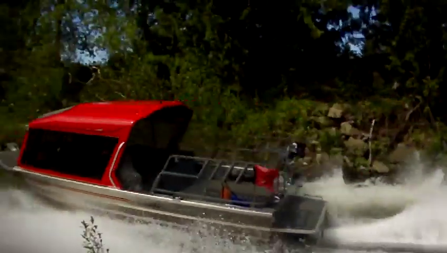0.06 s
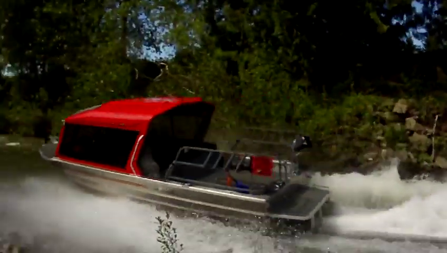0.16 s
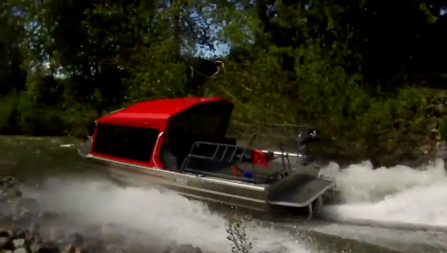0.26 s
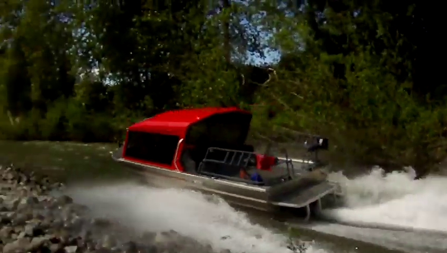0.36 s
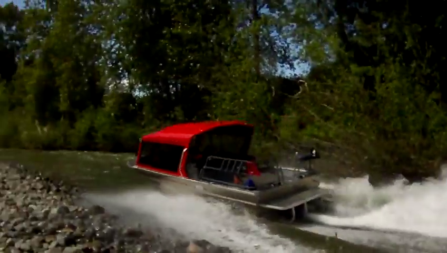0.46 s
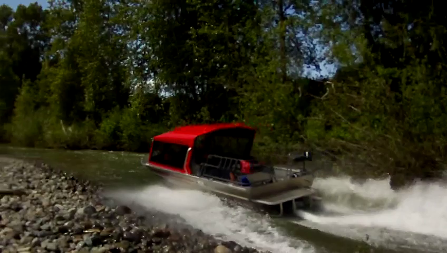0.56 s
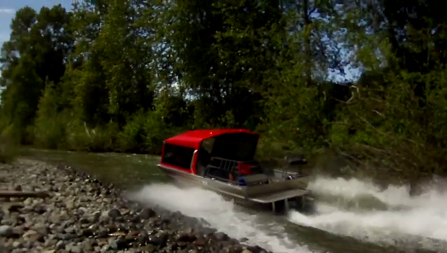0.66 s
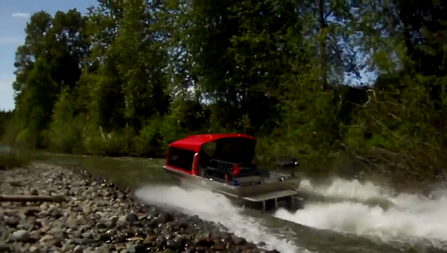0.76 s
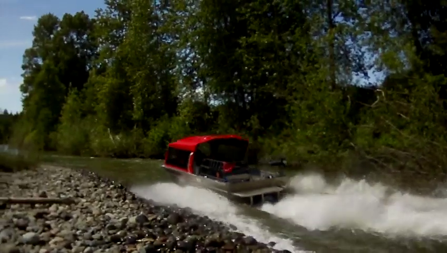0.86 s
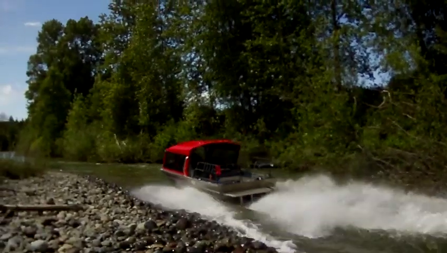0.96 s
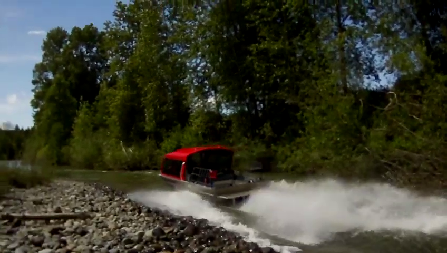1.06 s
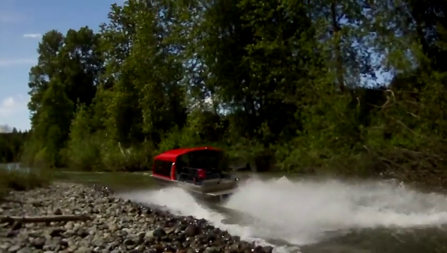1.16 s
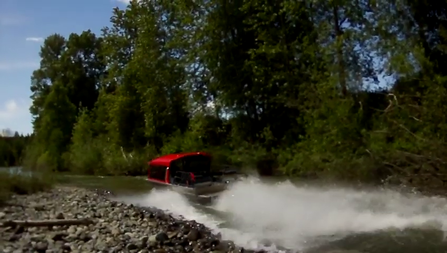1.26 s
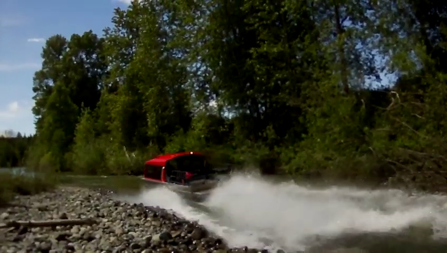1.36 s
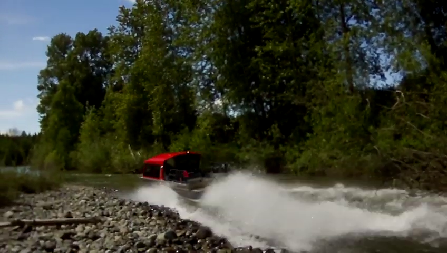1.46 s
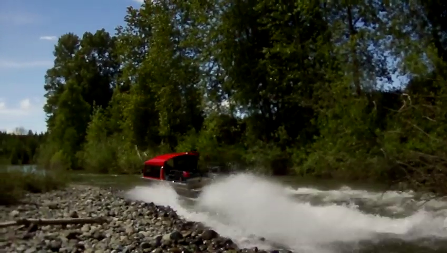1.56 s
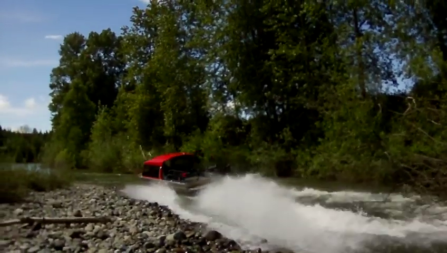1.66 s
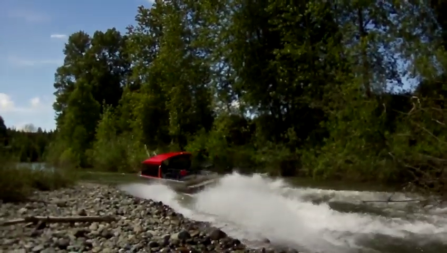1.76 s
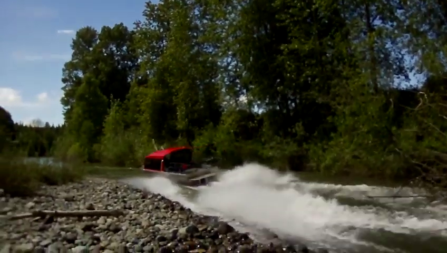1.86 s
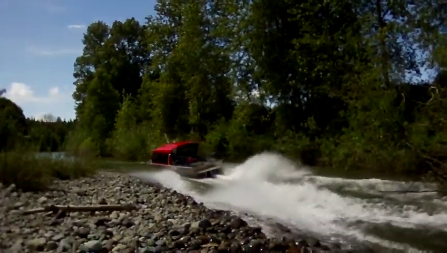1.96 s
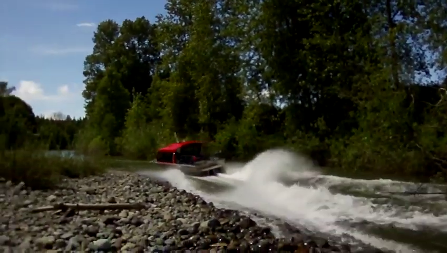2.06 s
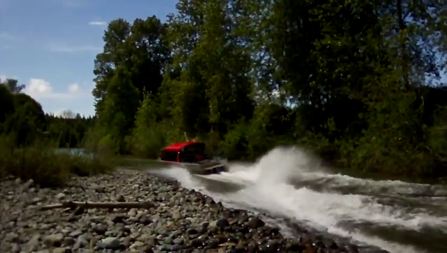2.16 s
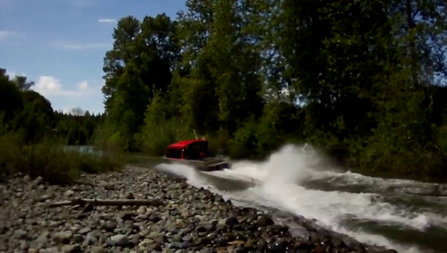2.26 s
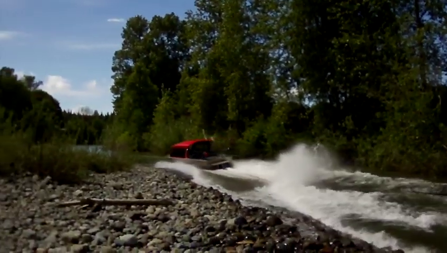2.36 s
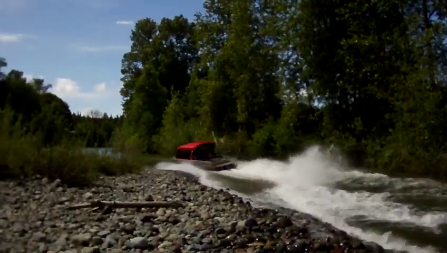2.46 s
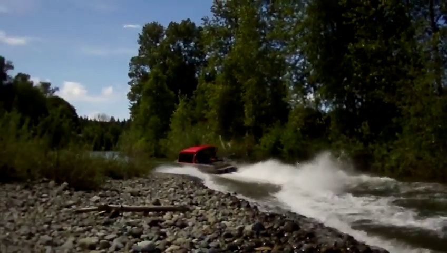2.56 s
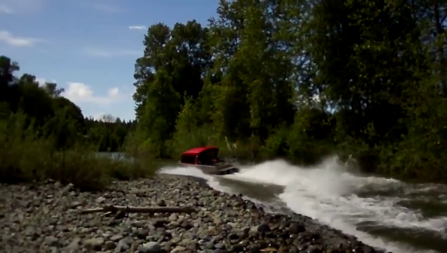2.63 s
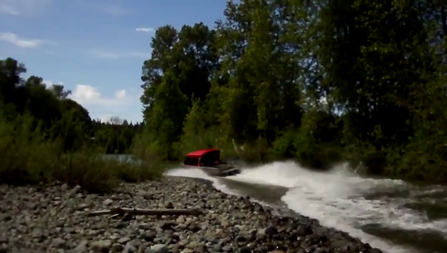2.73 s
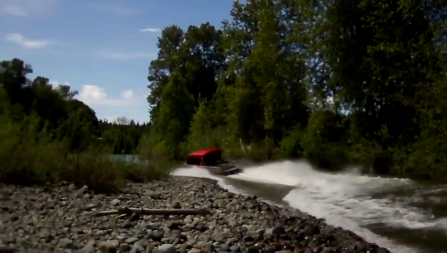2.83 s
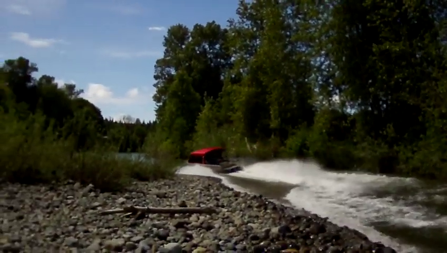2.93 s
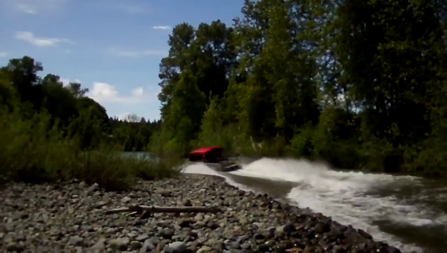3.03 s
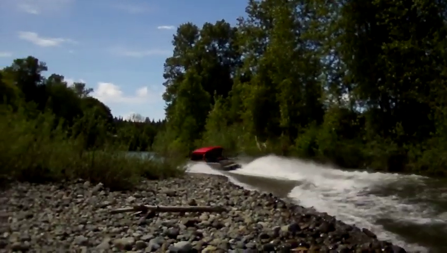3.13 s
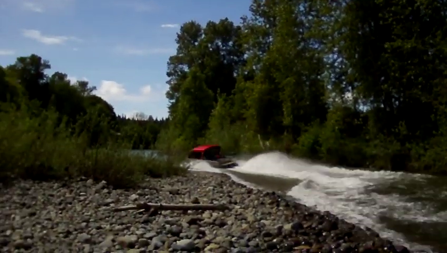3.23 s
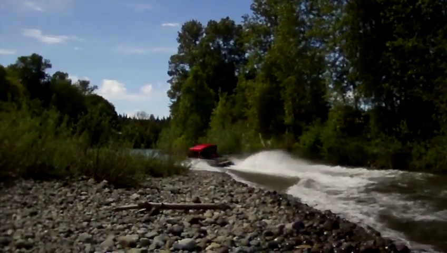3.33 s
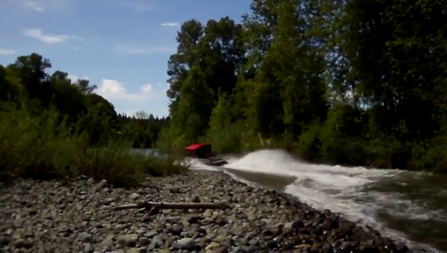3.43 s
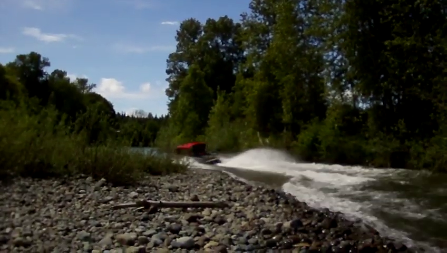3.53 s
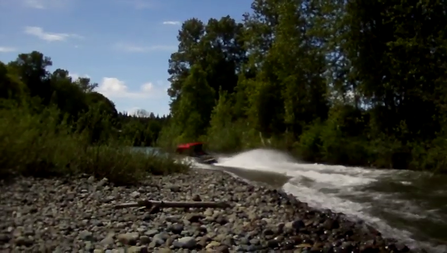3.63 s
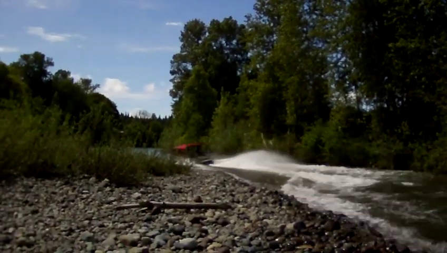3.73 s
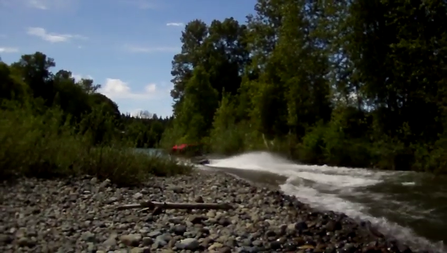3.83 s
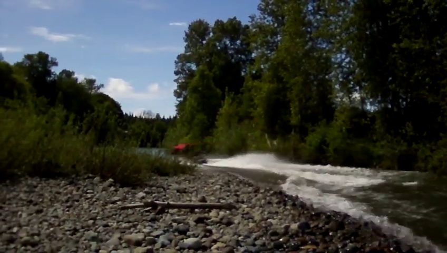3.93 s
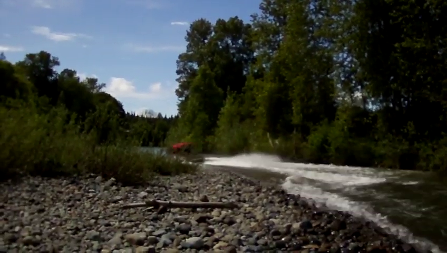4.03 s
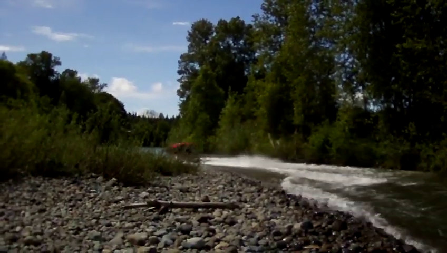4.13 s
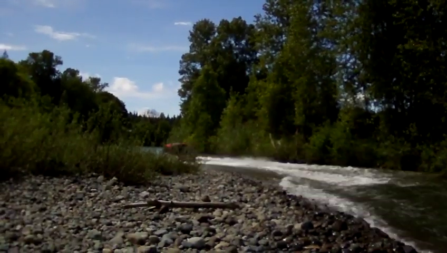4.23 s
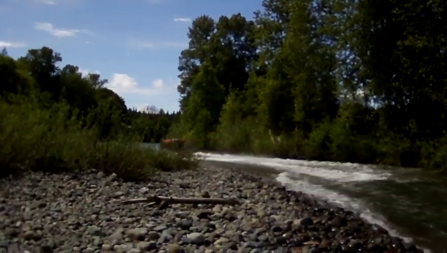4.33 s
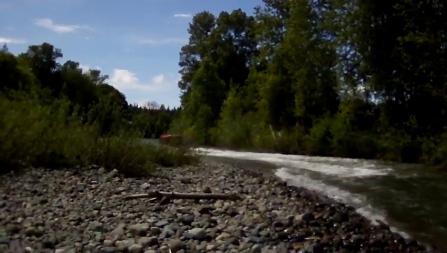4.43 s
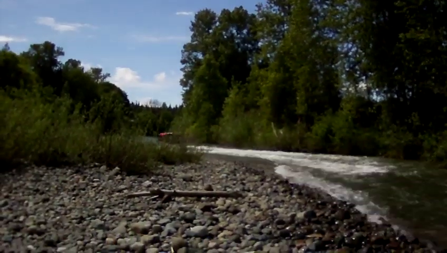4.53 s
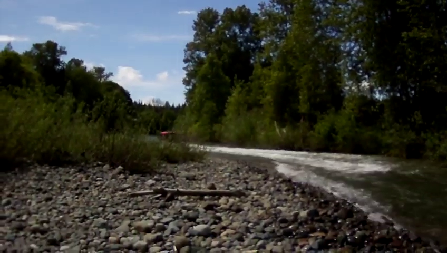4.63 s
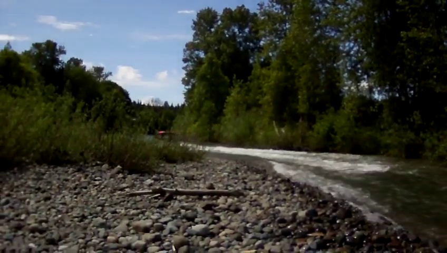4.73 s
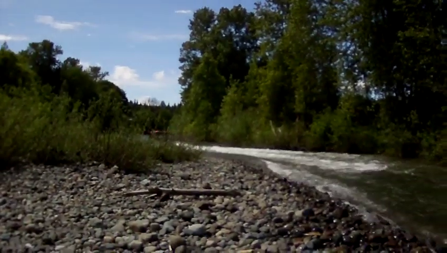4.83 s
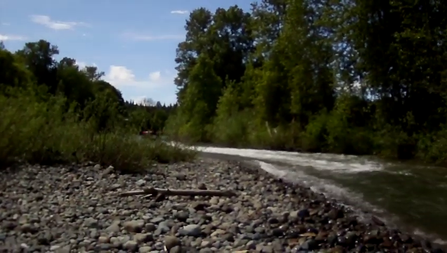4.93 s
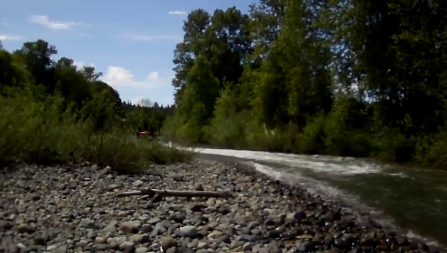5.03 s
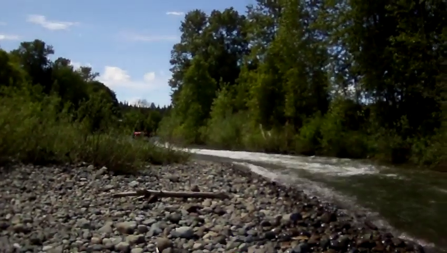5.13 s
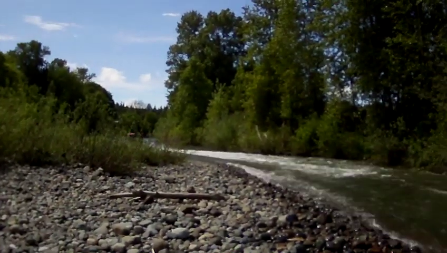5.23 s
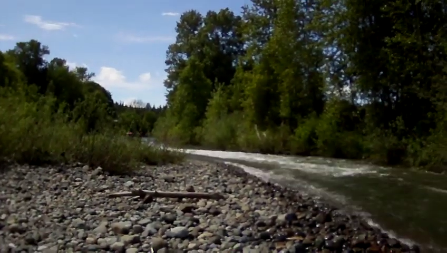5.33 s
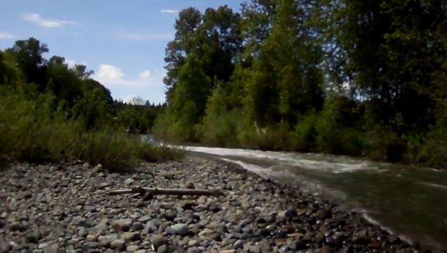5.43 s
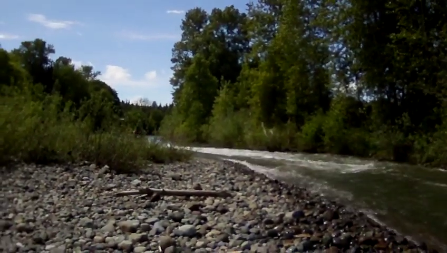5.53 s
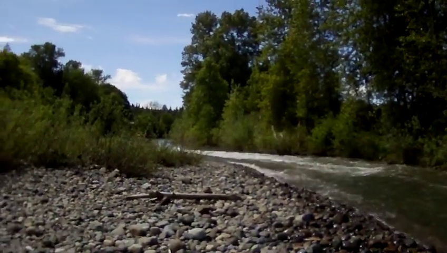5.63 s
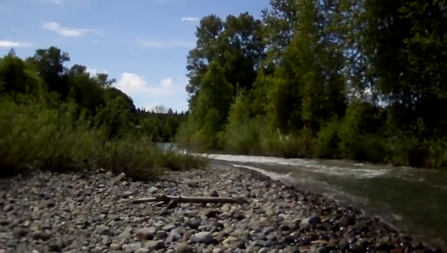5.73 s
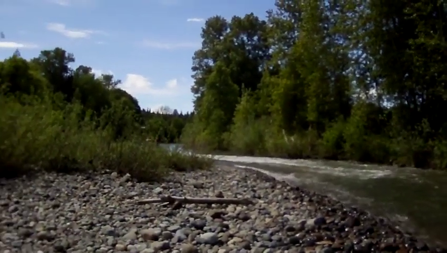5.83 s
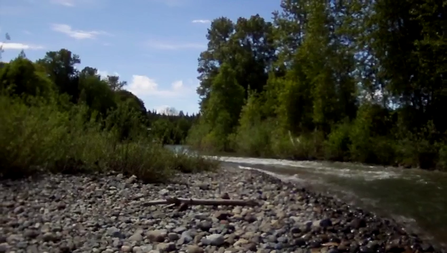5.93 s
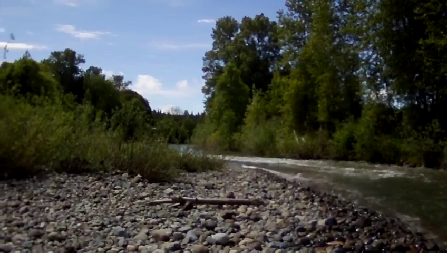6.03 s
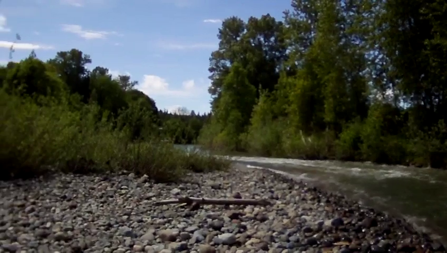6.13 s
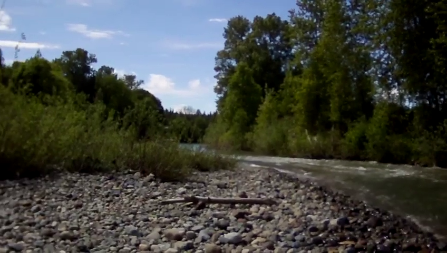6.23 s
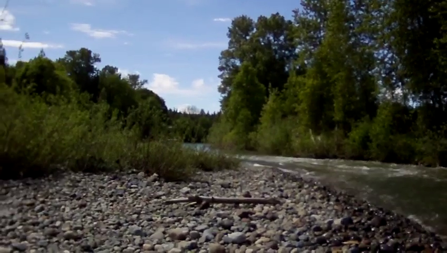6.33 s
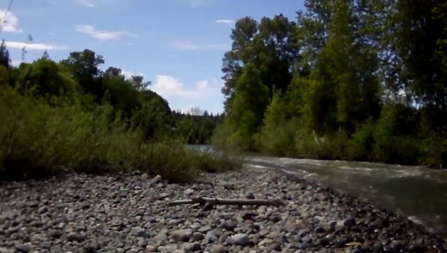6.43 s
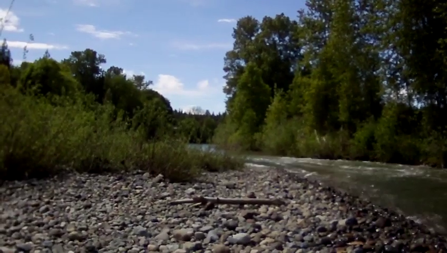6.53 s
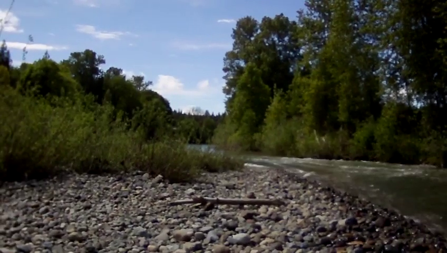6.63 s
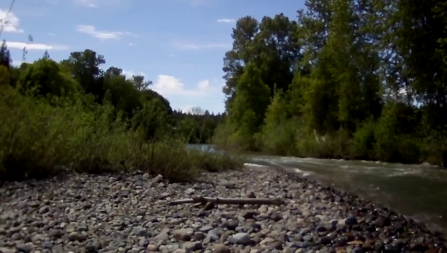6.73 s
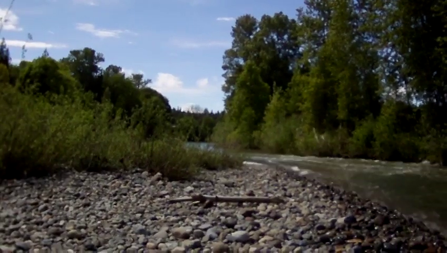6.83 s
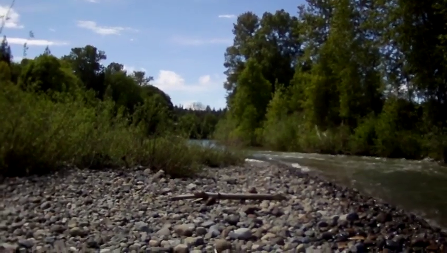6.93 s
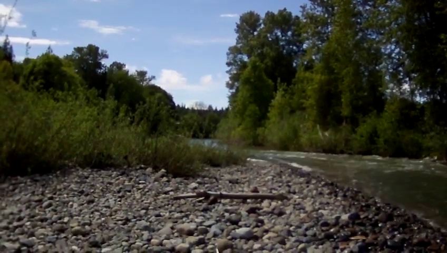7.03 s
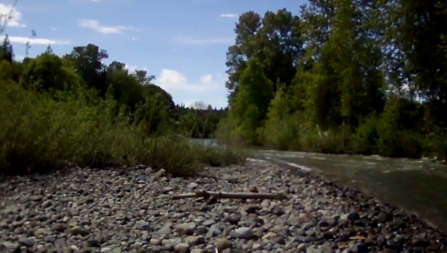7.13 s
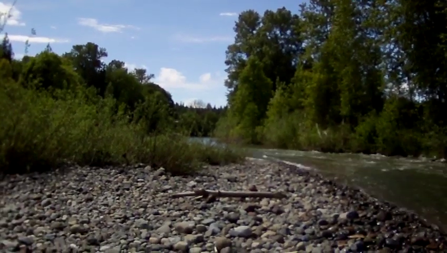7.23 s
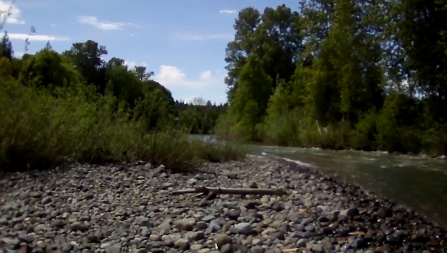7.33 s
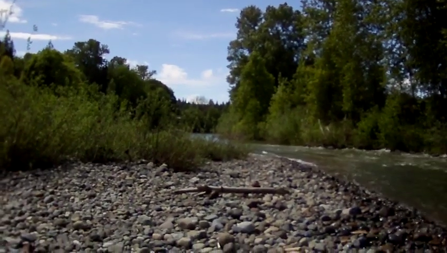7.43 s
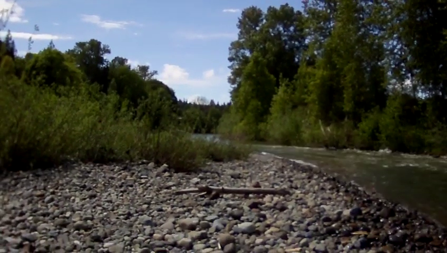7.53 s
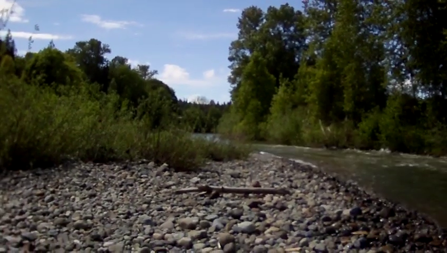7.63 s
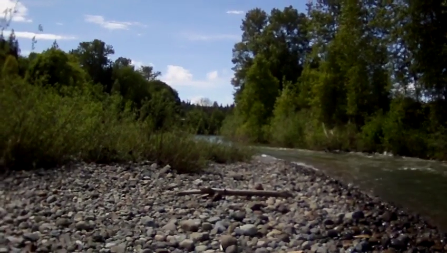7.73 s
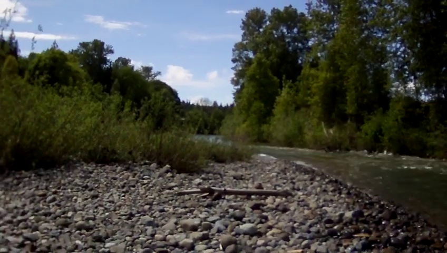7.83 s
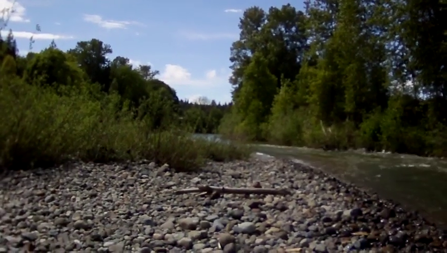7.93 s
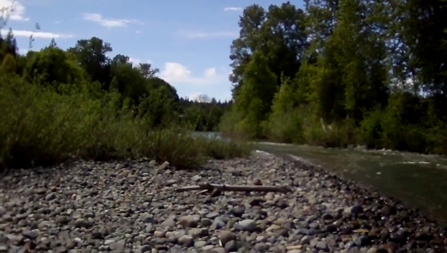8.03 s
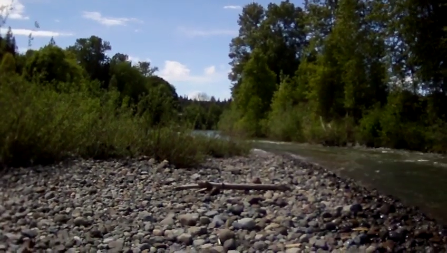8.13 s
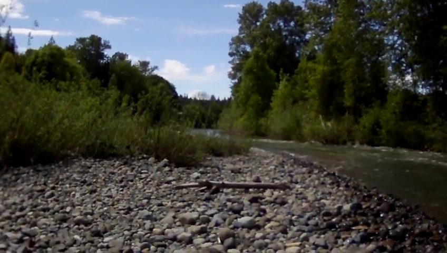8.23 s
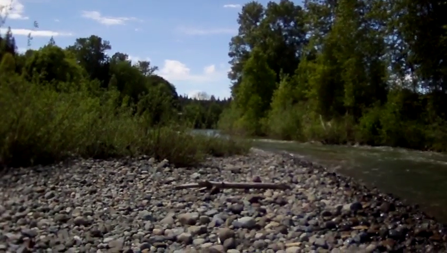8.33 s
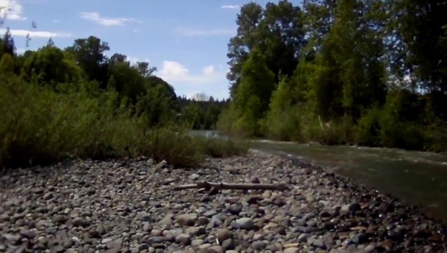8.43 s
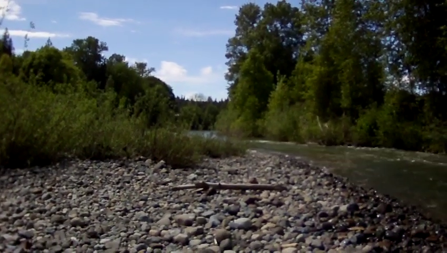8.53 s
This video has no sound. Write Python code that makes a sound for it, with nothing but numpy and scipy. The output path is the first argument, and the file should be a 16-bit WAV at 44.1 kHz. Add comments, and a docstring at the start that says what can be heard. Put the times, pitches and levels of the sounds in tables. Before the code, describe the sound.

Outdoors on a gravel riverbank, a loud boat engine is already alongside: rapid, rough exhaust cracks, deep roar and bright water hiss. It draws away quickly, becoming a smoother hum whose pitch drops, rises and drops again with throttle changes. The sound grows distant and wavering but stays audible to the end, over soft river rush and slight wind buffeting at a small, slightly dull microphone.

```python
"""One first hears a barking exhaust close by: a jet boat with an eight-cylinder engine, just past a gravel bar.
As it runs away up a river bend the bark dies and a drone of clean engine orders follows the throttle moves.
The orders are summed sines; the bark is filtered impulses, one set per loud firing; the banks return echoes.
Roar, hissing spray and the steady rush of the river are coloured noise whose octaves flicker apart.
Light wind on a small microphone is low band-passed noise with gusts."""
import sys
import numpy as np
from scipy import signal
from scipy.fft import rfft, irfft, next_fast_len
from scipy.io import wavfile

SR = 44100
rng = np.random.default_rng(int(sys.argv[2]) if len(sys.argv) > 2 else 0)


def store_pcm(level_fs):
    """Save levels as 16-bit WAV."""
    pcm = np.round(np.clip(level_fs, -1, 1) * 32767).astype(np.int16)
    wavfile.write(sys.argv[1], SR, np.atleast_2d(pcm).T)


N = 378378

# Spectrum of the river's rush, relative: [f/Hz, density/dB]
RIVER_SPECTRUM = [(160, -4), (280, 0), (364, -22), (409, -50), (515, 2.5), (659, 2.5), (752, -1.5),
                  (994, -12.5), (1380, -13.5), (1830, -6), (3150, -21.5), (3830, -36), (4590, -23),
                  (6380, -43), (14300, -34.5)]
RIVER_DB = -52  # before its flicker
# Wind gusts, added to the steady wind: [middle t/s, half-length t/s, level/dB]
GUSTS = [(.01, 0.044, -54), (0.361, 0.079, -57), (0.904, 0.17, -58), (3.3, .3, -77), (5.61, 0.11, -62),
         (8.05, 0.24, -72), (8.58, 0.061, -68)]
WIND_BAND_HZ = (22, 76.4)
WIND_START_DB, WIND_DB_PER_S = -62.5, -3
# Spectrum of the spray's hiss, relative: [f/Hz, density/dB]
SPRAY_SPECTRUM = [(760, -86), (1300, -5.5), (1560, 0.5), (1780, 1.5), (2520, 7), (2790, -5.5), (3220, 3),
                  (3860, 5.5), (4740, -7.5), (6560, -6.5), (7340, -13), (8210, -12), (11600, -22),
                  (13800, -33), (14800, -44)]
# Treble lift of the spray above 3 kHz, written with its sign reversed: [t/s, minus lift/dB per octave]
MINUS_TREBLE_LIFT = [(0, -4), (1.1, -3.5), (1.5, -2), (3, -2), (4.5, -2.5), (8.58, -2.7)]
GRAIN_START_DB, GRAIN_FADE_S = 1, 3.9  # fast unsteadiness of the close spray
# Spectrum of the exhaust roar, relative: [f/Hz, density/dB]
ROAR_SPECTRUM = [(70, -58), (130, 3), (250, -4), (350, -3), (500, 1.5), (700, -6), (1000, -15),
                 (1500, -31.5), (2500, -74)]
# Course of the two noises of the boat, before flicker: [t/s, roar level/dB, spray level/dB]
PASS_LEVELS = [(0, -36, -37), (.07, -33, -36), (.16, -33.5, -39.5), (.36, -31.5, -40.5), (.7, -37, -44),
               (.9, -35.5, -42.5), (1.08, -37, -44), (1.25, -39.5, -45.5), (1.5, -40, -44.5),
               (2.1, -42.5, -47), (2.55, -42, -49.5), (2.85, -44.5, -49.5), (3.23, -44.5, -52),
               (3.99, -50, -54.5), (4.8, -48, -57), (5.5, -50, -57.5), (7.03, -54, -59.5),
               (8.1, -52.5, -58), (8.58, -51, -59)]

# Engine speed aimed at by each throttle move: [t/s, f/(cycles of two turns per s)]
THROTTLE = [(0, 22.547), (.807, 28.088), (1.193, 26.673), (2.42, 15.306), (2.83, 26.098), (3.224, 24.177),
            (3.443, 19.241), (3.919, 14.63), (4.045, 10.031), (4.355, 14.308), (4.694, 22.715),
            (5.244, 13.847), (5.799, 10.054), (6.07, 11.62), (6.935, 14.104), (7.156, 18.802),
            (7.606, 17.084), (8.255, 22.363)]
ENGINE_LAG_S = .216
DOPPLER_CYCLE_HZ, DOPPLER_FADE_S = .513, .171  # excess pitch left over from the pass
# Response of pipes, water and microphone to the orders: [f/Hz, gain/dB]
PIPE_RESPONSE = [(40, -37), (70, -11.5), (95, -5.5), (125, 3), (150, 7), (190, 0.5), (230, -1.5),
                 (270, -3.5), (325, -5), (370, -4), (445, 3), (530, -7.5), (650, -11), (900, -67),
                 (1300, -14)]
# Strong orders ahead of bias and pipes: [t/s, even firing level/dB, lope of the unlike banks level/dB]
STRONG_ORDERS = [(0, -31.5, -33), (.2, -33.5, -30.5), (.75, -28.5, -32), (1.05, -42.5, -34),
                 (1.5, -55, -34.5), (1.9, -45.5, -33.5), (2.3, -51, -37), (2.6, -38.5, -40),
                 (2.9, -40, -45), (3.2, -43.5, -37.5), (3.6, -43, -43), (4.1, -43.5, -50.5),
                 (4.5, -45.5, -43), (4.9, -46.5, -47.5), (5.4, -43, -51), (6, -48.5, -53.5),
                 (6.7, -53.5, -63), (7.3, -48.5, -56), (7.7, -45.5, -55.5), (8.3, -45, -53.5),
                 (8.58, -49.5, -74)]
EVEN_ORDERS, LOPE_ORDERS = (8, 16), (5, 11, 13)
# The two cylinder banks are unlike, so some orders stand out: {order: gain/dB}
ORDER_BIAS = {4: 7.7, 5: 7.13, 6: -3.2, 7: 0.54, 8: 2.84, 9: -3.5, 10: 1.7, 11: -3, 12: -2, 13: -3, 14:
              0.93, 15: 4.2, 17: -0.28, 16: -3, 18: -0.87, 19: 0.26, 20: 0.44, 21: 0.73, 24: 1, 26: 1.3}
# Balance of the orders shifts as the boat turns away: {order: slope/dB per s}
ORDER_TREND = {3: -0.74, 4: -0.37, 5: -2.33, 6: 0.99, 9: 0.55, 14: 0.75, 15: -0.78}
# Passing dips of single orders: [order, middle t/s, half-length t/s, depth/dB]; negative depth swells
ORDER_DIPS = [(8, 3.86, .05, 20), (8, 5.12, .025, 16), (8, 5.51, .03, 16), (6, .35, .5, 16),
              (16, 1.4, .25, 10), (6, 2.2, .2, 12), (5, 3.0, .25, 8), (16, 3.0, .25, 8), (8, 3.4, .2, 5),
              (15, .25, .4, -8), (17, 1.05, .15, -6), (14, 2.1, .7, 10), (14, 3.3, .2, 8), (6, 3.4, .3, 3),
              (19, 3.55, .3, 3), (13, 4.0, .3, 5), (15, 1.6, .3, 4), (16, .6, .25, -3), (16, 5.75, .15, 7),
              (16, 6.3, .12, 7), (8, 6.2, .04, 4), (20, .15, .25, 9), (19, .3, .25, 8), (7, .6, .35, 5),
              (23, .66, .08, -9), (3, 2.6, .6, 10), (6, 4.65, .25, -6), (17, 7.15, .2, -8),
              (18, 7.35, .3, -8), (11, 7.1, .2, -4), (20, 6.75, .3, -6), (12, 6.55, .25, 6),
              (22, .4, .3, 5), (16, 4.3, .12, 5), (18, 1.1, .12, -3), (12, 2.8, .7, -5), (10, 2.75, .2, 8),
              (9, 4.3, .15, -8), (12, 4.7, .2, 6), (5, 5.3, .2, -7), (6, 5.25, .25, 5), (14, 5.35, .15, -5),
              (4, 2.75, .25, 6), (20, 2.35, .3, -6), (7, 2.3, .2, -4), (15, 5.3, .35, 10),
              (16, 6.05, .08, -5), (14, 5.85, .1, -5), (5, 8.3, .3, 8), (7, 1.7, .4, -4), (9, 1.75, .3, 12),
              (9, 3.1, .6, -5), (4, .1, .3, 6), (4, 4.0, .25, 12), (4, 5.3, .35, 7), (15, 3.85, .3, 10),
              (21, 1.4, .3, 12), (18, 1.55, .2, 10), (12, 1.6, .5, -5), (13, 2.9, .2, -6),
              (11, 3.35, .25, -4), (14, 3.95, .15, -4), (13, 4.95, .12, -6), (9, 5.85, .2, -6),
              (14, 6.7, .3, 8), (7, 3.15, .3, -3), (7, 5.1, .2, 7), (17, 1.9, .5, 9), (15, 3.1, .4, 9),
              (10, 3.6, .3, 8), (10, 5.4, .3, 8), (12, 5.25, .2, 8), (7, 5.8, .4, 7), (16, 3.95, .3, 10),
              (5, 4.7, .35, 12), (7, 4.65, .35, 10), (13, 4.6, .2, 8), (16, 5.25, .2, 16),
              (11, 5.35, .3, 6), (11, 8.1, .5, 8), (16, 8.4, .3, 7)]
# Swells of the minor orders above 16: [middle t/s, half-length t/s, gain/dB]
HIGH_SWELLS = [(0.605, 0.48, 7.5), (3.68, 0.52, 6)]
# Minor orders below and above 16: (start/dB, slope/dB per s, slope/dB per cycle/s above the reference)
MINOR_LOW, MINOR_HIGH = (-45, -2.27, 0.59), (-50, -2.4, 1)
REFERENCE_CYCLE_HZ = 20.66
# Scale of the random phases drawn apart by echoes: [t/s, phase/rad]
PHASE_SMEAR = [(0, 1.6), (3.05, 1.8), (3.27, .8), (3.48, .7), (3.65, 1.4), (4.4, 2.4), (6, 3.2),
               (8.58, 3.0)]
# Low minor orders take a share of the smear near by, and a lag in cycles per rad of smear scale
MINOR_SMEAR_SHARE, MINOR_LAG = .35, .019
WOBBLE_CYCLES = .003  # unsteady running
# Stern on, minor orders from 15 up keep step with the firing, later and later
IN_STEP_MIDDLE_S, IN_STEP_HALF_S, IN_STEP_SHARE = 1.0, .22, .85
IN_STEP_LAG_CYCLES, IN_STEP_LAG_S = (.02, .1), (.8, .95)
# Near the stern the thumps stand in for the minor orders above this one
NEAR_ORDER, NEAR_DUCK_DB, NEAR_UNTIL_S = 22, 9, 1.0
# Round the bend every order but the first even one wavers more
FAR_FROM_S, FAR_FULL_S, FAR_WAVER_DB, FAR_WAVER_RAD = 3.8, 6.0, 1.6, .45

# Loud firings of a cycle: [share of cycle, crack/dB, thump/dB, heard from t/s, dies away at t/s];
# both levels are relative
FIRINGS = [(.052, -1, 0, -1, 1.13), (.352, -4.5, -8, -1, .70), (.662, -2.5, -1, -1, .58),
           (.725, -2.5, -9, .58, .72)]
CRACK_GAIN_DB, CRACK_HZ, CRACK_JITTER_S = 1.0206, (573, 980), .00009
STEP_EARLY_S, STEP_LATE_S = .001134, .0006966  # the two pressure steps about the firing, at t = 0
THUMP_GAIN_DB, THUMP_HZ, THUMP_ENDS_EARLY_S = 7.5, (520, 900), .08
THUMP_SINK_DB, THUMP_SINK_FROM_S, THUMP_SINK_OVER_S = 7, .68, .25  # as the stern draws off
SNAP_GAIN_DB, SNAP_SCATTER_DB, SNAP_HZ = -23.5, 4, (1400, 4500)
# Echoes off the wooded banks, relative: [delay t/s, level/dB]
ECHOES = [(0.048, -3), (.083, 4), (0.132, 16), (.19, 17.5), (0.269, -4)]
# Common gain of all echoes: [t/s, gain/dB]
ECHO_GAIN = [(0, -29), (2.5, -45.5), (4, -33), (6, -61), (7.5, -31), (8.58, -53)]
CUTOFF_HZ = 14966


def from_db(db):
    """Level to amplitude: 20 dB is a factor of ten."""
    return 10 ** (np.asarray(db) / 20)


def rms_one(x):
    """Normalisation to unit root-mean-square amplitude."""
    return x / np.sqrt(np.mean(x ** 2) + 1e-20)


def in_time(rows):
    """Linear interpolation of each column at every sample."""
    s, *columns = np.transpose(rows)
    return [np.interp(np.arange(N) / SR, s, c) for c in columns]


def at_hz(points, hz):
    """Linear interpolation of a spectrum in dB over log frequency."""
    table = np.array(points)
    return np.interp(np.log(hz), np.log(table[:, 0]), table[:, 1])


def bump(t, middle_s, half_s):
    """Gaussian bell of height 1, falling to 1/e at the half-length."""
    return np.exp(-((t - middle_s) / half_s) ** 2)


def drift(corner_hz, size=1):
    """Slow random process of unit spread at every size-th sample: noise through two equal poles."""
    coarse = 40  # samples between draws
    r = np.exp(-2 * np.pi * corner_hz * coarse / SR)
    noise = rng.standard_normal(N // coarse + 2002)
    slow = signal.lfilter([1], [1, -2 * r, r * r], noise)[2000:]  # drop the settling
    return np.interp(np.arange(0, N, size) / coarse, np.arange(len(slow)), rms_one(slow))


def band(x, hz):
    """Butterworth band-pass: maximally flat within the band."""
    return signal.sosfilt(signal.butter(2, hz, "band", fs=SR, output="sos"), x)


def patchy_noise(spectrum, patchy_db, treble_lift_db=0):
    """Spectral shaping of white noise, split into overlapping octaves whose levels flicker apart."""
    size = next_fast_len(N)
    hz = np.maximum(np.arange(size // 2 + 1) * SR / size, 1)
    colour = rfft(rng.standard_normal(size)) * from_db(at_hz(spectrum, hz))
    colour /= np.std(irfft(colour, size))
    out, together = 0, drift(3.9)
    for centre_hz in 62.5 * 2. ** np.arange(9):
        octaves = np.log2(hz / centre_hz)
        share = np.where(abs(octaves) < 1, np.cos(np.pi / 2 * octaves) ** 2, 0)
        if np.any(abs(colour * share) > 0):
            flicker_db = patchy_db * (.3 * together + drift(9.0))
            gain_db = flicker_db + treble_lift_db * max(np.log2(centre_hz / 3000), 0)
            out = out + from_db(gain_db) * irfft(colour * share, size)[:N]
    return out


def river():
    """Broadband flow noise: a steady level with a coloured spectrum."""
    return from_db(RIVER_DB) * patchy_noise(RIVER_SPECTRUM, patchy_db=0.5)


def wind():
    """Low-frequency wind noise at the microphone: lumpy band-passed noise that eases off, with gusts."""
    t = np.arange(N) / SR
    level = from_db(WIND_START_DB + WIND_DB_PER_S * t)
    level = level + sum(from_db(db) * bump(t, s, half_s) for s, half_s, db in GUSTS)
    lumps = from_db(1.5 * drift(6.0))
    rumble = band(band(rng.standard_normal(N), WIND_BAND_HZ), WIND_BAND_HZ)
    return level * lumps * rms_one(rumble)


def spray(level_db):
    """Broadband hiss of thrown water: coloured noise, its fast grain fading as the boat leaves."""
    treble_lift_db = -in_time(MINUS_TREBLE_LIFT)[0]
    grain_db = GRAIN_START_DB * np.exp(-np.arange(N) / SR / GRAIN_FADE_S) * drift(140.0)
    hiss = patchy_noise(SPRAY_SPECTRUM, patchy_db=0.6, treble_lift_db=treble_lift_db)
    return from_db(level_db + grain_db) * hiss


def roar(level_db, cycles):
    """Amplitude modulation: gas and water tumble out hardest just after the strongest firing."""
    throb = 1 + 0.022 * np.cos(2 * np.pi * (cycles - .1))
    return from_db(level_db) * throb * patchy_noise(ROAR_SPECTRUM, patchy_db=1.04)


def engine_speed():
    """Critically damped lag towards each throttle setting, with a Doppler excess decaying after the pass."""
    t = np.arange(N) / SR
    hz = THROTTLE[0][1] + DOPPLER_CYCLE_HZ * np.exp(-t / DOPPLER_FADE_S)
    for (_, before), (s, after) in zip(THROTTLE, THROTTLE[1:]):
        lags = np.maximum(t - s, 0) / ENGINE_LAG_S
        hz = hz + (after - before) * (1 - (1 + lags) * np.exp(-lags))
    return hz


def drone(cycles, cycle_hz, waver_db, waver_rad):
    """Fourier synthesis: orders 3 to 39 as sines timed from the strongest firing, phases smeared by echoes."""
    step = 8  # synthesise at a reduced rate
    t, cycle_hz = np.arange(0, N, step) / SR, cycle_hz[::step]
    even_db, lope_db = [c[::step] for c in in_time(STRONG_ORDERS)]
    smear_rad = in_time(PHASE_SMEAR)[0][::step]
    low_db, high_db = [db + per_s * t + per_hz * (cycle_hz - REFERENCE_CYCLE_HZ)
                       for db, per_s, per_hz in (MINOR_LOW, MINOR_HIGH)]
    high_db = high_db + sum(db * bump(t, s, half_s) for s, half_s, db in HIGH_SWELLS)
    far = np.clip((t - FAR_FROM_S) / (FAR_FULL_S - FAR_FROM_S), 0, 1)
    since_firing = cycles[::step] - FIRINGS[0][0] + WOBBLE_CYCLES * drift(2.8, size=step)
    out = 0
    for k in range(3, 40):
        smear = smear_rad * rng.standard_normal()
        if k in EVEN_ORDERS + LOPE_ORDERS:
            level_db = even_db if k in EVEN_ORDERS else lope_db
            smear = smear * (.15 + .4 * far)
        else:
            level_db = (low_db if k < 16 else high_db) + waver_db * drift(0.69, size=step)
            if k < 15:
                lag_cycles = MINOR_LAG * np.minimum(smear_rad, 1.8)
                smear = smear * (MINOR_SMEAR_SHARE + (1 - MINOR_SMEAR_SHARE) * far)
                smear = smear - 2 * np.pi * k * lag_cycles
            else:
                in_step = IN_STEP_SHARE * bump(t, IN_STEP_MIDDLE_S, IN_STEP_HALF_S)
                lag_cycles = np.interp(t, IN_STEP_LAG_S, IN_STEP_LAG_CYCLES)
                smear = smear * (1 - in_step) - 2 * np.pi * k * lag_cycles * in_step
            if k > NEAR_ORDER:
                level_db = level_db - NEAR_DUCK_DB * np.exp(-(t / NEAR_UNTIL_S) ** 4)
        level_db = level_db + ORDER_BIAS.get(k, 0) + ORDER_TREND.get(k, 0) * t
        level_db = level_db + at_hz(PIPE_RESPONSE, k * cycle_hz)
        level_db = level_db - sum(db * bump(t, s, half_s)
                                  for order, s, half_s, db in ORDER_DIPS if round(order) == k)
        # high orders feel the scatter between cycles most
        loose = k / 20
        level_db = level_db + waver_db * min(loose, 1) * drift(5.6, size=step)
        angle = 2 * np.pi * k * since_firing + smear
        angle = angle + waver_rad * loose ** 2 * smear_rad * drift(3.4, size=step)
        if k != EVEN_ORDERS[0]:
            level_db = level_db + far * FAR_WAVER_DB * drift(2.0, size=step)
            angle = angle + far * FAR_WAVER_RAD * drift(1.5, size=step)
        out = out + np.sqrt(2) * from_db(level_db) * np.sin(angle)
    return signal.resample_poly(out, step, 1, padtype="edge")[:N]


def bark(cycles):
    """Impulse excitation: each loud firing gives a round thump, two steep pressure steps and a bright snap."""
    steps, thumps, snaps = np.zeros(N), np.zeros(N), np.zeros(N)
    t = np.arange(N) / SR
    count = np.arange(30)  # cycles that may bark
    for place, crack_db, thump_db, from_s, until_s in FIRINGS:
        s = np.interp(count + place, cycles, t)
        crack_fade, thump_fade = [(s > from_s) / (1 + np.exp(np.clip((s - end_s) / .015, -50, 50)))
                                  for end_s in (until_s, until_s - THUMP_ENDS_EARLY_S)]
        scatter_db = 1.8 * rng.standard_normal((len(count), 3))
        jitter_s = CRACK_JITTER_S * rng.standard_normal((len(count), 2))
        sink_db = THUMP_SINK_DB * np.clip((s - THUMP_SINK_FROM_S) / THUMP_SINK_OVER_S, 0, 1)
        thump_at = np.round(s * SR).astype(int)
        thumps[thump_at] += thump_fade * from_db(thump_db + scatter_db[:, 2] - sink_db)
        # the two steps draw together as the boat runs off, each gaining relative to the fade
        near = np.clip(1 - s / 1.33, 0, 1)
        pair = [(-STEP_EARLY_S, 3 - 5.5 * near), (STEP_LATE_S, 5.5 - 2.5 * near)]
        for side, (offset_s, step_db) in enumerate(pair):
            at = np.round((s + jitter_s[:, side] + offset_s * np.sqrt(near)) * SR).astype(int)
            steps[at] += crack_fade * from_db(crack_db + step_db + scatter_db[:, side])
        # the snap falls on the second step
        snap_db = crack_db + SNAP_SCATTER_DB * rng.standard_normal(len(count))
        snaps[at] += crack_fade * from_db(snap_db)
    # forward and backward filtering keeps the thump symmetric
    thump = signal.sosfiltfilt(signal.butter(1, THUMP_HZ, "band", fs=SR, output="sos"), thumps + 1e-18)
    ring = signal.lfilter(*signal.butter(1, CRACK_HZ, "band", fs=SR), steps + 1e-18)
    crack = band(ring, (500, 2800))
    snap = band(snaps + 1e-18, SNAP_HZ)
    return from_db(CRACK_GAIN_DB) * crack + from_db(THUMP_GAIN_DB) * thump + from_db(SNAP_GAIN_DB) * snap


def bank_echoes(exhaust):
    """Discrete reflection: delayed copies of the exhaust, eased in, under one changing gain."""
    eased = exhaust * np.minimum(np.arange(N) / SR / .3, 1)
    late = sum(from_db(db) * np.pad(eased, (round(s * SR), 0))[:N] for s, db in ECHOES)
    return from_db(in_time(ECHO_GAIN)[0]) * late


def scene():
    """Superposition of river, wind, spray, roar and exhaust; engine phase is the integral of its speed."""
    cycle_hz = engine_speed()
    cycles = np.cumsum(cycle_hz) / SR
    roar_db, spray_db = in_time(PASS_LEVELS)
    background = river() + wind()
    boat_noise = spray(spray_db) + roar(roar_db, cycles)
    exhaust = drone(cycles, cycle_hz, waver_db=1.4, waver_rad=.11) + bark(cycles)
    exhaust = exhaust + bank_echoes(exhaust)
    return (background + boat_noise + exhaust)[None]


def record(dry):
    """Band limitation: a steep elliptic low-pass removes the top of the spectrum."""
    return signal.sosfilt(signal.ellip(12, .5, 70, CUTOFF_HZ, fs=SR, output="sos"), dry)


dry = scene()
out = record(dry)
store_pcm(out)
```